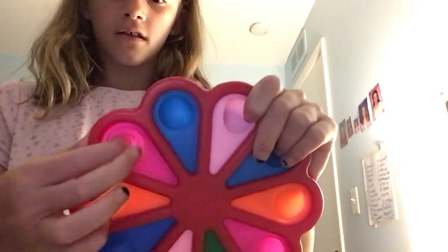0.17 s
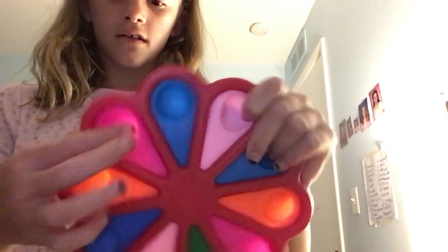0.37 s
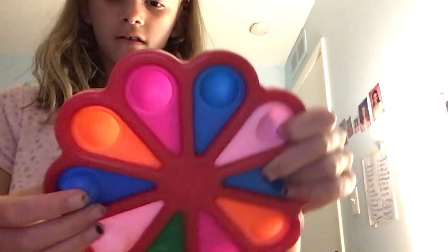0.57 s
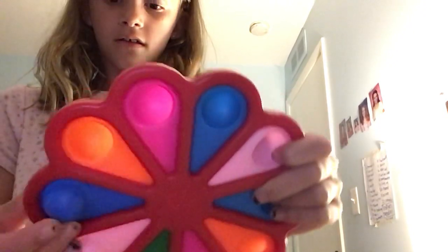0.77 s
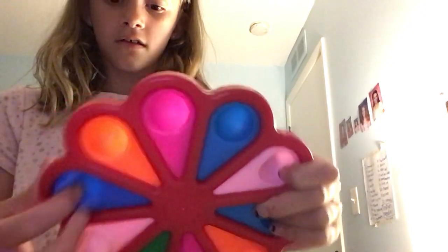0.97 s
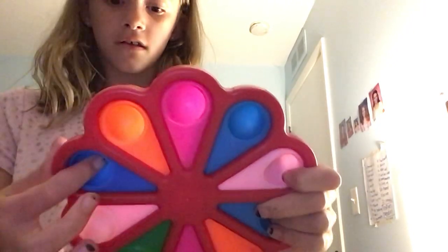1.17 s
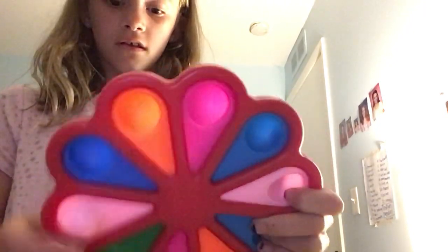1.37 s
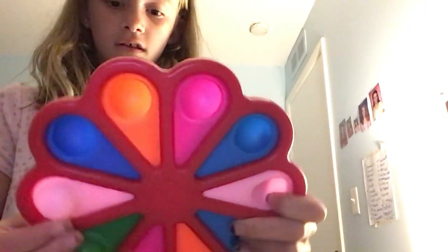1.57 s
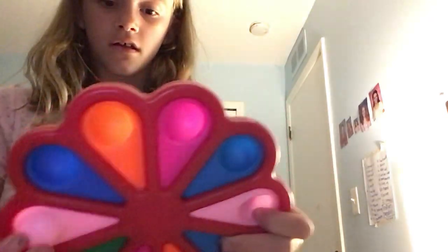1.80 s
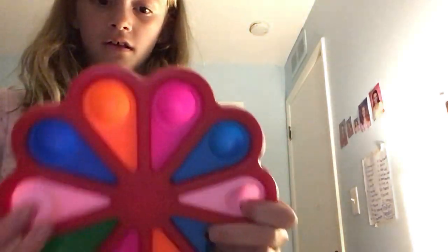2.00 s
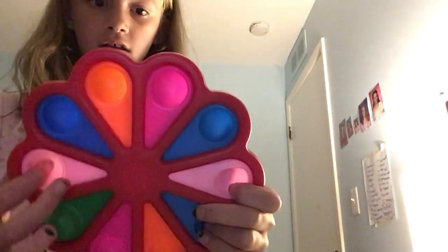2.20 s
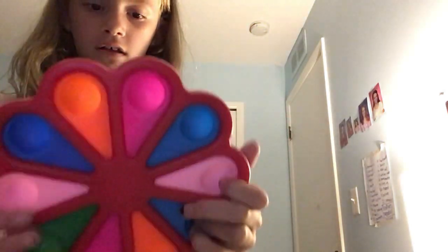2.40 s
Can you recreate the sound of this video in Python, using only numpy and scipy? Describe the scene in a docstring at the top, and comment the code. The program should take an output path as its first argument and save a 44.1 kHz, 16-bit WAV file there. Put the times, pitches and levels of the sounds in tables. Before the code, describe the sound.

A silicone push-pop toy gives a sharp, quickly doubled pop at about 0.2 seconds, close to the microphone in a small quiet room. Faint finger taps, rubs and dull bumps follow. Two more pops come at about 1.0 and 1.1 seconds, then more soft handling. Another sharp pop lands near 2.2 seconds, followed by two small faint pops at about 2.3 and 2.4 seconds.

```python
"""Silicone bubbles of a push-pop toy are pressed through, close to the microphone in a small quiet room.
Each dome snaps through by buckling: a crack that rings the plastic frame, a tone that dives as the
tension goes, and a soft thump. Between the pops, fingers knock, tick, rub and bump on the toy, and two
small pops come last. The room adds a short reverberation; a faint rumble with hiss lies underneath."""
import sys
import numpy as np
from scipy import signal
from scipy.fft import rfft, irfft
from scipy.io import wavfile

SR = 44100
rng = np.random.default_rng(int(sys.argv[2]) if len(sys.argv) > 2 else 0)


def int16_out(signal):
    """Quantize to a 16-bit WAV file."""
    q = np.round(np.clip(np.atleast_2d(signal).T, -1, 1) * 32767)
    wavfile.write(sys.argv[1], SR, q.astype(np.int16))


N = 108045
T = np.arange(N) / SR
CLICK_RISE_MS = 0.23


def undb(db):
    """Amplitude ratio of a level in decibels."""
    return 10 ** (np.asarray(db) / 20)


def unit(x):
    """Normalisation to an rms of one."""
    return x / np.sqrt(np.mean(x ** 2))


def since_ms(start_s):
    """Milliseconds elapsed since an onset, zero before it."""
    return np.maximum(T - start_s, 0) * 1000


def colour(x, points):
    """Zero-phase filtering by (frequency_hz, gain_db) points joined over log frequency."""
    hz, db = np.array(points, float).T
    bins_hz = np.maximum(np.fft.rfftfreq(len(x), 1 / SR), 1)
    gain = undb(np.interp(np.log(bins_hz), np.log(hz), db))
    return irfft(rfft(x) * gain, len(x))


def shaped_noise(spectrum):
    """White noise filtered to a spectral envelope, at unit rms."""
    return unit(colour(rng.standard_normal(N), spectrum))


def band_noise(hz, sharpness):
    """Band-limited noise at unit rms; bandwidth in octaves varies inversely with sharpness."""
    edge = 2 ** (1 / max(sharpness, .3))
    sos = signal.butter(2, [hz / edge, min(hz * edge, .45 * SR)], "band", fs=SR, output="sos")
    return unit(signal.sosfilt(sos, rng.standard_normal(N)))


def burst(ms, rise_ms, decay_ms):
    """Envelope of a transient: quick attack, exponential decay."""
    return (1 - np.exp(-ms / rise_ms)) * np.exp(-ms / decay_ms)


def ping(ms, hz, decay_ms):
    """Free vibration of one damped mode."""
    return np.sin(2 * np.pi * hz * ms / 1000) * burst(ms, rise_ms=0.083, decay_ms=decay_ms)


def thud(centre_s, hz, width_ms):
    """Heavily damped swaying: a cycle or two under a Gaussian envelope."""
    t = T - centre_s
    return np.cos(2 * np.pi * hz * t) * np.exp(-(t * 1000 / width_ms) ** 2)


def noise_floor():
    """Stationary broadband noise, heard as a low rumble with faint hiss."""
    # Spectral density of the background: frequency_hz, relative_db
    floor_spectrum = [(20, -26), (38, -8.5), (55, 1), (78, 3), (105, -3.5), (170, -10), (250, -10),
                      (400, -18), (700, -22), (1200, -24), (3000, -26.5), (9000, -33), (14500, -39),
                      (16000, -49.5)]
    return undb(-66) * shaped_noise(floor_spectrum)


def room(x):
    """Reverberation by convolution: sparse early reflections and a diffuse tail whose treble dies first."""
    # Frequency response of the reverberation: frequency_hz, gain_db
    room_colour = [(100, -8.5), (200, -5.5), (330, 0.5), (650, -2), (1400, -2.5), (2300, 3), (3800, -1),
                   (5200, -1), (8000, 2), (11000, 1), (15000, -3.5)]
    onset_ms, reflections_per_s = 4.2, 1500
    t = T[:SR // 2]
    build_up = 1 - np.exp(-(t * 1000 / onset_ms) ** 2)

    def fade(t60_s):
        """Exponential decay of 60 dB in t60_s, with a soft onset."""
        return np.exp(-np.log(1000) * t / t60_s) * build_up

    noise = rng.standard_normal(len(t))
    low = signal.sosfilt(signal.butter(1, 2500, fs=SR, output="sos"), noise)
    tail = low * fade(t60_s=.2) + (noise - low) * fade(t60_s=.175)
    strengths = rng.standard_normal(len(t))
    arrivals = rng.random(len(t)) < reflections_per_s / SR
    early = strengths * arrivals * fade(t60_s=.06)
    response = undb(-17.5) * tail / np.linalg.norm(tail) + undb(-16) * early / np.linalg.norm(early)
    return colour(signal.fftconvolve(x, response)[:N], room_colour)


def grip_bumps():
    """Soft impacts of the shifting grip excite only low frequencies."""
    # Dull bumps: centre_s, level_db, pitch_hz
    bumps = [(.422, -57, 181), (0.532, -47.5, 129), (0.543, -56, 156), (.573, -54.5, 112.4),
             (0.875, -56.5, 128), (1.730, -54.5, 120)]
    return sum(undb(db) * thud(centre_s, hz, width_ms=7.9) for centre_s, db, hz in bumps)


def skin_rubs():
    """Sliding friction of skin on silicone: bands of noise that swell and fade."""
    # Slides and squeaks: centre_s, length_s, level_db, centre_hz, sharpness
    rubs = [(.470, 0.03, -66.5, 2760, 2.2), (.475, 0.021, -66, 686, 1.26), (0.719, 0.031, -70, 597.6, 2.77),
            (1.312, 0.02, -69, 2856, 2), (1.306, 0.04, -67.5, 680, 0.78), (1.45, .10, -76, 1800, 1.65),
            (1.535, .04, -68.5, 600, 4.3), (1.641, 0.033, -71.5, 3330, 2.4),
            (1.777, 0.023, -67.5, 2830, 1.36), (1.78, 0.019, -63, 3150, 15), (2.375, .05, -72.5, 2204, 0.9)]
    out = np.zeros(N)
    for centre_s, length_s, db, hz, sharpness in rubs:
        swell = np.exp(-(2 * (T - centre_s) / length_s) ** 2)
        out += undb(db) * band_noise(hz, sharpness) * swell
    return out


def ticks_and_snap():
    """Noise transients: light ticks of fingers and creasing silicone, and a popping dome's mid-range snap."""
    # Short noise bursts: start_s, level_db, centre_hz, decay_ms
    noise_bursts = [(0.172, -61.5, 7000, 2.9), (0.179, -55.5, 7700, 8.8), (.186, -53, 706.4, 2.4),
                    (.200, -56, 577, 1.3), (0.22, -50, 9500, 0.92), (0.41, -52.5, 6000, 0.7),
                    (0.541, -62.5, 2500, 3.1), (.9784, -31.5, 1450, 1.67), (1.1185, -35.5, 2450, 2.8),
                    (1.2748, -51, 3000, 1.2), (1.29, -51, 2430, 2.5), (1.3205, -58.5, 7000, 1),
                    (1.648, -60, 650, 6.6), (2.231, -53.5, 6760, 1.7), (2.316, -57, 2800, 3.5),
                    (2.342, -44, 409, 10), (2.4096, -46, 2140, 0.73)]
    rise_cycles = 0.41
    out = np.zeros(N)
    for start_s, db, hz, decay_ms in noise_bursts:
        envelope = burst(since_ms(start_s), rise_cycles * 1000 / hz, decay_ms)
        out += undb(db) * band_noise(hz, sharpness=1.9) * envelope
    return out


def knocks_and_small_pops():
    """Impulse excitation: finger knocks and two small, faint pops, each a click with a short hollow ring."""
    # Knocks, then two small pops: start_s, click_db, click_decay_ms, body_db, body_hz, body_decay_ms
    hollow_clicks = [(.384, -52, 4.5, -58.5, 420, 9.5), (.414, -58, 5.6, -57, 382, 6.6),
                     (.561, -61, 2.6, -52.5, 680, 1.53), (.665, -61.5, 1.7, -60.5, 582.6, 5.5),
                     (1.7187, -57, 2.2, -67, 450, 5.4), (1.877, -60, 2, -56.5, 514, 3.2),
                     (1.965, -63, 4.9, -57, 530, 4.9), (2.3374, -39.5, 3.3, -42, 430, 5.1),
                     (2.4083, -40.5, 1.2, -43.5, 430, 2.3)]
    # Spectrum of the click: frequency_hz, relative_db
    click_spectrum = [(200, -7.5), (600, 3.5), (1200, 10.5), (1800, -2), (2500, 4), (4000, -2),
                      (5500, -14.5), (11000, -19.5), (15000, -28)]
    click = shaped_noise(click_spectrum)
    out = np.zeros(N)
    for start_s, click_db, click_decay_ms, body_db, body_hz, body_decay_ms in hollow_clicks:
        ms = since_ms(start_s)
        out += undb(click_db) * click * burst(ms, CLICK_RISE_MS, click_decay_ms)
        out += undb(body_db) * ping(ms, body_hz, body_decay_ms)
    return out


def frame_ring(ms):
    """Modal superposition: each snap weights the frame's modes anew; neighbours swing in antiphase."""
    # Modes of the plastic frame: pitch_hz, level_db, t60_ms
    frame_modes = [(356, -7.5, 25), (1110, -2, 5.1), (1570, -10.5, 2.3), (2216, -6, 8), (2820, -2.5, 10),
                   (3300, -9, 4.66), (4170, -5.5, 7)]
    weights = 1 + 0.379 * rng.uniform(-1, 1, len(frame_modes))
    out = np.zeros(N)
    for k, (hz, db, t60_ms) in enumerate(frame_modes):
        out += (-1) ** k * undb(db) * weights[k] * ping(ms, hz, t60_ms / np.log(1000))
    return out


def dome_tone(ms, start_hz, end_hz, glide_ms, rise_ms, decay_ms):
    """Natural frequency falls with tension, so the ringing dome dives in pitch as it goes slack."""
    overtone_ratio, overtone_db = 2.1, -14
    hz = end_hz + (start_hz - end_hz) * np.exp(-ms / glide_ms)
    phase = 2 * np.pi * np.cumsum(hz * (ms > 0)) / SR
    overtone = undb(overtone_db) * np.exp(-ms / decay_ms) * np.sin(overtone_ratio * phase)
    return burst(ms, rise_ms, decay_ms) * (np.sin(phase) + overtone)


def dome_pops():
    """Snap-through buckling releases elastic energy as a tone, a ping, frame ring, crackle and a thump."""
    # Dome snaps: start_s, tone_db, start_hz, end_hz, glide_ms, rise_ms, decay_ms,
    # ping_hz, ping_db, ping_decay_ms, ring_db, crackle_db, thump_hz, thump_db, thump_lag_ms
    snaps = [(.2112, -3, 834, 237, 2.34, 1.7, 1.7, 2890, -23.5, 2.7, -19, -16.5, 273, -22.5, 2.3),
             (0.2221, -8.5, 1720, 196, 1.025, 0.083, 3.25, 3700, -9, 0.48, -26, -26, 230.6, -26, 8.2),
             (0.979, -2, 486.7, 452, 1.1, 4, 1.62, 4730, -36, 0.8, -38.5, -39.5, 171.3, -30.5, 7),
             (1.1210, -8.5, 1260, 279.5, 2.44, 0.62, 1.94, 3065, -26, 0.83, -25.5, -34.5, 149.4, -25, 6.9),
             (2.1579, -22.5, 700, 400, 2.42, 0.446, 1.48, 6150, -33.5, 1.08, -41.5, -35, 192, -60, 5.1),
             (2.1627, -3, 947, 345, 1.165, 0.52, 1.54, 1354, -20.5, 3.05, -18, -23.5, 178.6, -25.5, 8.7)]
    # Spectrum of the crackle as the skin lets go: frequency_hz, relative_db
    crackle_spectrum = [(500, -14), (2000, -1.5), (4300, 1.5), (5400, -2), (6800, -2.5), (8400, -1.5),
                        (9500, -5), (11300, -0.5), (13500, -5), (16000, -21)]
    crackle = shaped_noise(crackle_spectrum)
    out = np.zeros(N)
    for (start_s, tone_db, start_hz, end_hz, glide_ms, rise_ms, decay_ms,
         ping_hz, ping_db, ping_decay_ms, ring_db, crackle_db, thump_hz, thump_db, thump_lag_ms) in snaps:
        ms = since_ms(start_s)
        out += undb(tone_db) * dome_tone(ms, start_hz, end_hz, glide_ms, rise_ms, decay_ms)
        out += undb(ping_db) * ping(ms, ping_hz, ping_decay_ms)
        out += undb(ring_db) * frame_ring(ms)
        out += undb(crackle_db) * crackle * burst(ms, CLICK_RISE_MS, decay_ms=1.14)
        out += undb(thump_db) * thud(start_s + thump_lag_ms / 1000, thump_hz, width_ms=3.6)
    return out


def scene():
    """Superposition of the toy's direct sound, the background noise and the room's reverberation."""
    toy = dome_pops() + knocks_and_small_pops() + ticks_and_snap() + skin_rubs() + grip_bumps()
    return (toy + noise_floor() + room(toy))[None]


def record(dry):
    """Band limiting: the microphone thins the deep bass and cuts the highest treble."""
    bass_cut = signal.butter(4, 48, "high", fs=SR, output="sos")
    treble_cut = signal.ellip(8, .2, 70, 15800, fs=SR, output="sos")
    return signal.sosfilt(treble_cut, signal.sosfilt(bass_cut, dry))


dry = scene()
out = record(dry)
int16_out(out)
```